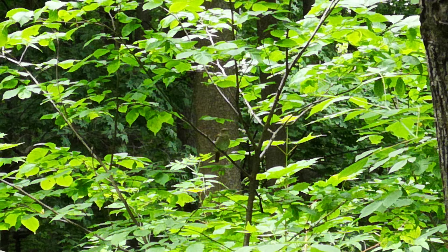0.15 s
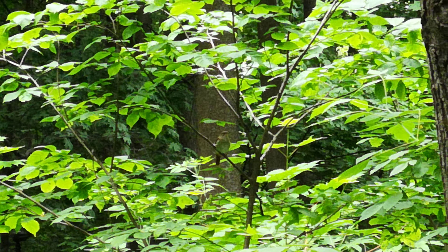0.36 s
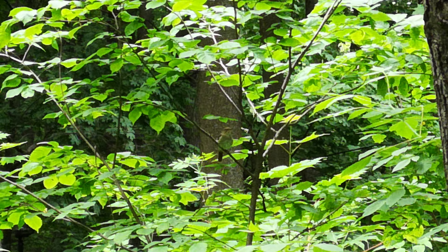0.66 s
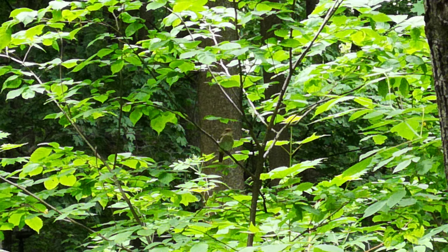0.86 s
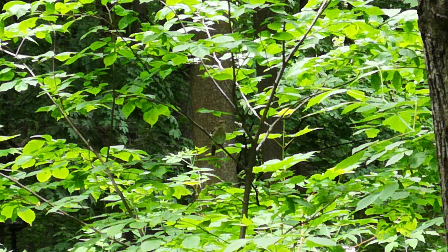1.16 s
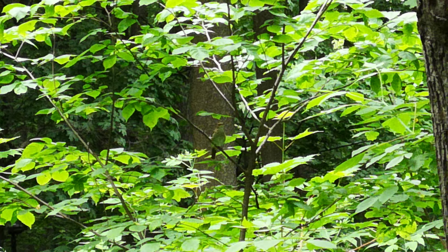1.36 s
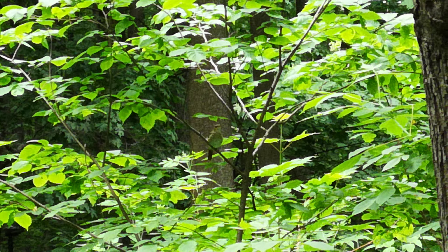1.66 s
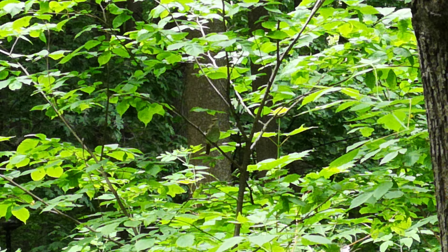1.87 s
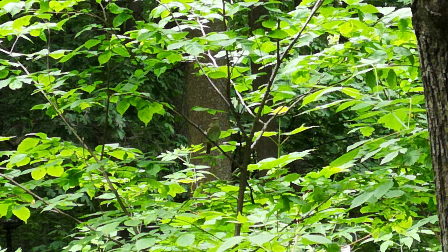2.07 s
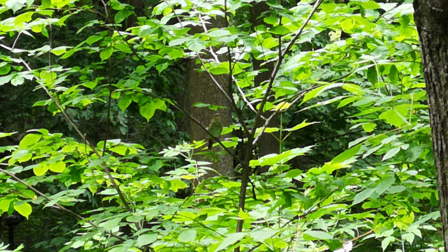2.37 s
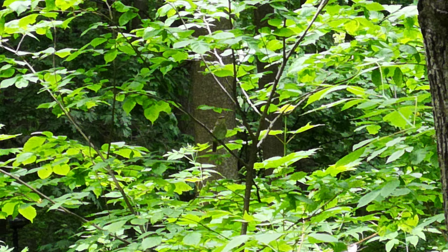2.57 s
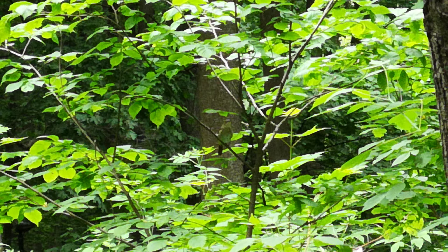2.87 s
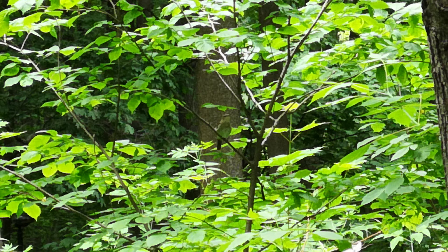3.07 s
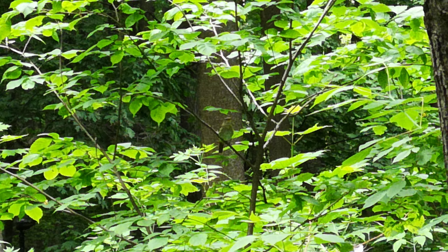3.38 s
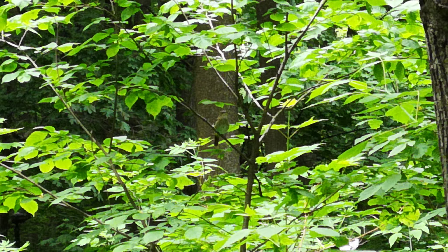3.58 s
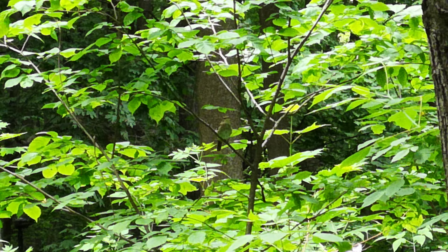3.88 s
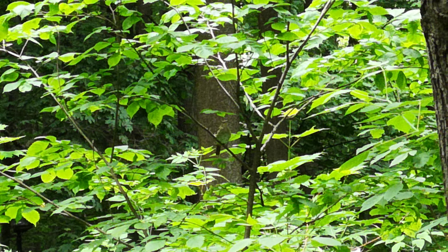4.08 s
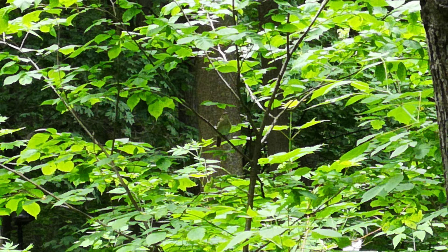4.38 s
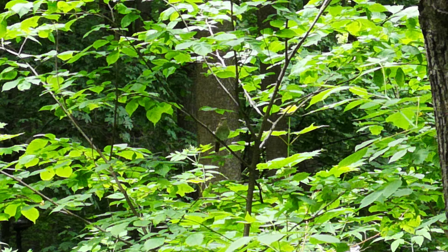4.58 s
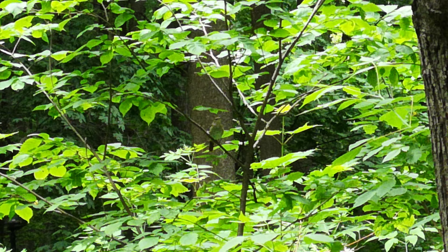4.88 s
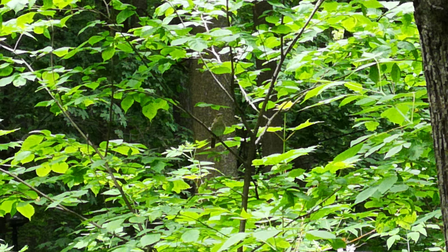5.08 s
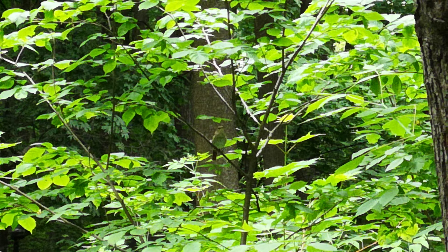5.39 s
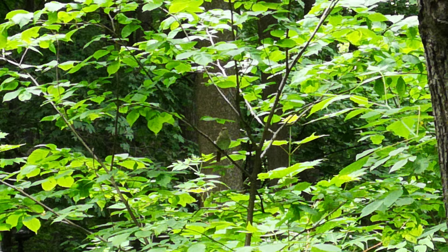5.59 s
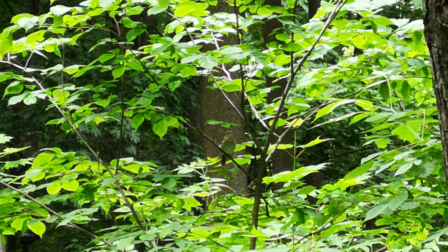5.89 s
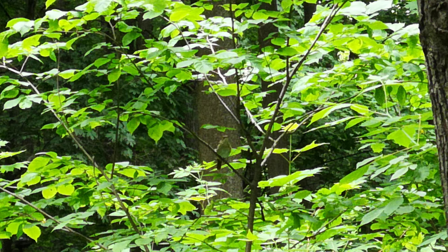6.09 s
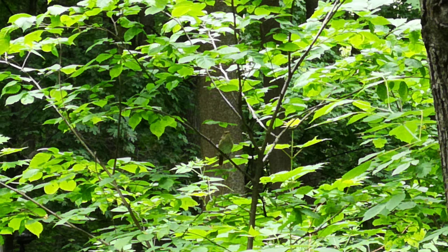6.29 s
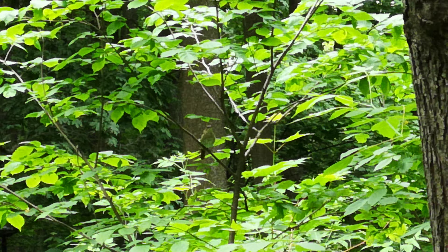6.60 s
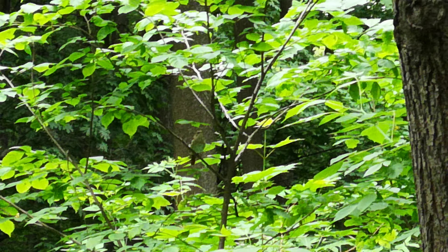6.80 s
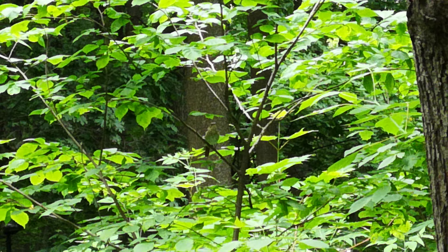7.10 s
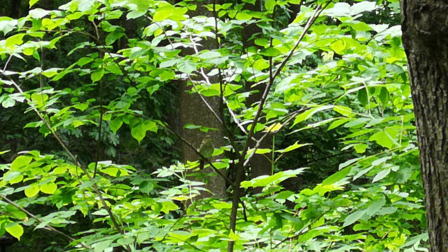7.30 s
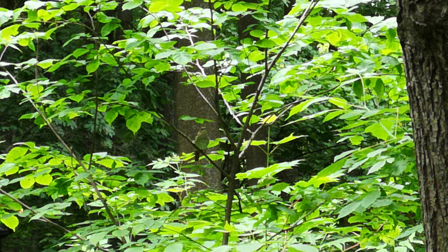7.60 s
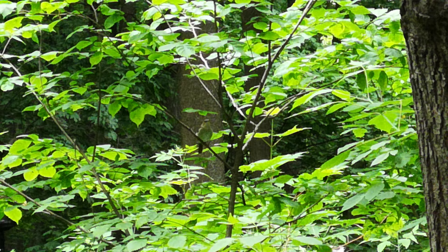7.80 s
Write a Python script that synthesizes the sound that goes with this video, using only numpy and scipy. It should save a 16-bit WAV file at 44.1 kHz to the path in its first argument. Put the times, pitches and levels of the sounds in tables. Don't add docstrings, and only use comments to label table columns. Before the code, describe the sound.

Thin bright whistles, low fluting notes and a six-beat clicking rattle from a songbird in an echoing wood, then one loud twig crack at right.

```python
import sys
import numpy as np
from scipy import signal
from scipy.fft import rfft, irfft, next_fast_len
from scipy.io import wavfile
from scipy.ndimage import uniform_filter1d

SR = 44100
rng = np.random.default_rng(int(sys.argv[2]) if len(sys.argv) > 2 else 0)


def decibels_to_gain(level_db):
    exponent = np.asarray(level_db, float) / 20
    return 10 ** exponent


def materialize(psi):
    bounded = np.clip(np.atleast_2d(psi).T, -1, 1)
    quanta = np.round(bounded * 32767).astype(np.int16)
    wavfile.write(sys.argv[1], SR, quanta)


N = 350154
T = np.arange(N) / SR
HZ = np.maximum(np.fft.rfftfreq(N, 1 / SR), 1)


def along(table, hz):
    f, v = np.transpose(table)
    return np.interp(np.log(hz), np.log(f), v)


def colour(x, db):
    return irfft(rfft(x, N) * decibels_to_gain(db), N)


def unit(x):
    return x / np.sqrt(np.mean(x ** 2))


def walk(rate):
    k = int(SR / rate)
    steps = np.repeat(rng.standard_normal(N // k + 1), k)
    return 1.5 * uniform_filter1d(uniform_filter1d(steps, k), k)[:N]


def ring(x, hz, t60):
    pole = np.exp(2j * np.pi * hz / SR - np.log(1000) / (t60 * SR))
    return signal.lfilter([1], [1, -pole], x).imag


def glides(rows, halfway):
    return [(s, length, first, first + halfway * (last - first), last, db)
            for s, length, first, last, db in rows]


def whistles(notes, swell, close, linger=0):
    # multiple of the whistle, level in dB under it.
    overtones = [(2, -33.5), (4, -48), (7, -49)]
    # frequency in Hz, level in dB.
    beak = [(3500, -3.5), (7500, -2), (9500, -20), (11500, -3), (13500, -11.5)]
    longest_rise_s = .026
    out = np.zeros(N)
    for s, length, first, middle, last, db in notes:
        i, u = int(s * SR), np.linspace(0, 1, int(length * SR))
        curve = np.polyfit([0, .5, 1], [first, middle, last], 2)
        hz = np.polyval(curve, u - linger * np.sin(2 * np.pi * u) / (2 * np.pi))
        phase = 2 * np.pi * np.cumsum(hz) / SR
        tone = np.sin(phase)
        for k, under_db in overtones:
            level = decibels_to_gain(under_db + along(beak, k * hz))
            tone = tone + level * np.sin(round(k) * phase) * (k * hz < 14000)
        rise = np.sin(np.pi / 2 * np.minimum(u / min(swell, longest_rise_s / length), 1)) ** 2
        fall = np.sin(np.pi / 2 * np.minimum((1 - u) / close, 1))
        out[i:i + len(u)] += (np.sqrt(2) * decibels_to_gain(db + 2.4) * rise * fall * tone)[:N - i]
    return out


def wood(x, wet_db):
    # frequency in Hz, time to fall 60 dB in seconds, level in dB.
    echoes = [(1500, 0.77, 3.5), (3420, 0.92, 3.5), (4580, 0.73, -7.5), (5230, 0.97, 0), (5800, 0.85, 2.5),
              (7400, 0.56, -2), (9500, 0.56, 6.5), (12000, .25, 0.5)]
    build_up_s = .012
    n = int(1.2 * SR)
    t, f = T[:n], np.maximum(np.fft.rfftfreq(n, 1 / SR), 1)
    patchy_db = 0.94 * np.array([walk(118)[:n], walk(120)[:n]])
    noise = rfft(rng.standard_normal((2, n)) * decibels_to_gain(patchy_db))
    tail = 0
    for k, (hz, t60, db) in enumerate(echoes):
        share = along([(h, float(j == k)) for j, (h, *_) in enumerate(echoes)], f)
        tail = tail + irfft(noise * share, n) * decibels_to_gain(db - 60 * t / t60)
    tail = tail * (1 - np.exp(-t / build_up_s))
    tail = tail * (1 + 2.18 * np.exp(-t / 0.025))
    tail = tail * decibels_to_gain(wet_db) / np.sqrt(SR)
    return signal.fftconvolve(x[None], tail, axes=1)[:, :N]


def background():
    # time in seconds, load in dB.
    traffic = [(0, -49), (.3, -40.5), (1.0, -39.5), (1.4, -41.5), (1.8, -40.5), (2.1, -43), (2.45, -39.5),
               (2.56, -31.5), (2.9, -44), (3.5, -39), (4.2, -39), (4.7, -41), (5.5, -41.5), (6.2, -39),
               (6.7, -40), (7.2, -39.5), (7.86, -38), (7.94, -47)]
    follow_load = [1.0, .4, .2, 0]
    wander_db = [0.49, 0.87, 0.99, 0.99]
    # frequency in Hz, level in dB per Hz.
    rumble = [(12, -34), (20, -13.5), (43, -5), (62, 1), (74, -8.5), (92, -9), (180, -17.5), (270, -25.5),
              (581, -40.5), (947, -25.5), (1250, -34), (1900, -39), (4000, -61.5), (5200, -89),
              (8800, -120)]
    # frequency in Hz, side minus mid in dB.
    sides = [(30, -15), (60, -38), (125, -17.5), (250, -14), (500, 5), (1000, -3), (2000, 0.5), (8000, 0)]
    # frequency in Hz, level in dB per Hz.
    hiss = [(2350, -20), (4000, -1), (4240, -5), (5330, -1.5), (6200, -4.5), (7430, -0.5), (8400, -13.5),
            (9440, -16), (12800, -16.5), (15200, -14.5), (16200, -23)]
    s, load = np.transpose(traffic)
    load = np.interp(T, s, load - np.median(load))
    swells = [share * load + db * walk(3.053) for share, db in zip(follow_load, wander_db)]
    swell_s, swell_width_s, swell_db = 2.22, 1.18, 6
    swells[-1] = swells[-1] + swell_db * np.exp(-((T - swell_s) / swell_width_s) ** 2)

    n = next_fast_len(N, real=True)
    f = np.maximum(np.fft.rfftfreq(n, 1 / SR), 1)
    mid, side, left, right = rfft(rng.standard_normal((4, n)))
    mid = mid * decibels_to_gain(along(rumble, f))
    side = side * decibels_to_gain(along(rumble, f) + along(sides, f))
    low = np.array([mid + side, mid - side])
    high = np.array([left * decibels_to_gain(2.2), right]) * decibels_to_gain(along(hiss, f))
    low = low * decibels_to_gain(-37) / np.std(irfft(low, n))
    high = high * decibels_to_gain(-72.5 + 2.5) / np.std(irfft(high, n))
    both = low + high

    out = 0
    for hz in 20 * 2 ** np.arange(0, 10.1, .5):
        share = np.clip(1 - 2 * np.abs(np.log2(f / hz)), 0, 1)
        follow = [along([(h, float(j == k)) for j, h in enumerate([90, 230, 900, 7000, 9500])], hz)
                  for k in range(4)]
        flicker_db = .6 * walk(7.4)
        db = sum(w * v for w, v in zip(follow, swells) if w) + flicker_db
        out = out + decibels_to_gain(db) * irfft(both * share, n)[:, :N]
    return out


def far_calls():
    # start in seconds, length in seconds, first Hz, last Hz, level in dB.
    short_calls = [(.16, .08, 2490, 2720, -69), (.19, .06, 2920, 2830, -76), (.225, .05, 2400, 2300, -62),
                   (.28, .075, 2380, 2330, -66), (1.585, .018, 3300, 4000, -71),
                   (1.66, .018, 3300, 4200, -69), (1.735, .018, 3200, 4000, -69),
                   (2.035, .09, 3450, 3190, -59), (2.21, .07, 3520, 3200, -57),
                   (2.285, .065, 3300, 3180, -62), (2.39, .05, 3500, 3100, -64),
                   (4.66, .04, 3200, 2300, -75), (5.6, .09, 2600, 2250, -73), (4.88, .012, 4500, 7500, -73)]
    # start in seconds, level in dB.
    arches = [
        (2.13, -62),
        (2.18, -67),
        (2.31, -59),
    ]
    notes = glides(short_calls, 0.69) + [(s, .03, 4940, 5900, 4720, db) for s, db in arches]
    return whistles(notes, 0.15, 0.5)


def far_warble():
    # time in seconds, level in dB, centre pitch in Hz.
    path = [
        (1.5, -72, 3800),
        (1.8, -59, 3950),
        (2.1, -58, 4300),
        (2.4, -55, 4200),
        (2.55, -47, 3700),
        (2.9, -54.5, 3612),
        (3.1, -54.5, 3400),
        (3.25, -54.5, 2790),
        (3.5, -71, 2700),
    ]
    s, db, hz = np.transpose(path)
    trembling_hz = np.interp(T, s, hz) * (1 + 0.26 * walk(160))
    phase = 2 * np.pi * np.cumsum(trembling_hz) / SR
    return np.sin(phase) * decibels_to_gain(np.interp(T, s, db, -120, -120) + 1.5 * walk(20))


def far_trill():
    start_s, period_s, count = 6.874, .0648, 17
    beats = start_s + period_s * np.arange(count)
    fade_db = -75 - 24 * (beats - 7.55) ** 2 + 1.5 * rng.standard_normal(count)
    notes = [(s, .016, 5100, 5900, 6800, db) for s, db in zip(beats, fade_db)]
    notes += [(s + 0.016, .011, 6300, 6800, 7400, db - 2) for s, db in zip(beats[:-1], fade_db[::-1])]
    return whistles(notes, 0.61, 0.33)


def far_birds():
    # start in seconds, length in seconds, first Hz, middle Hz, last Hz, level in dB.
    chirp = [
        (3.909, 0.0096, 2400, 1996, 1540, -40),
    ]
    calls, warble, trill = far_calls(), far_warble(), far_trill()
    direct = calls * decibels_to_gain(np.array([[-3.5], [-1.5]])) + trill * decibels_to_gain(np.array([[-5.0], [3.0]]))
    direct = direct + whistles(chirp, 0.64, 0.53) * decibels_to_gain(np.array([[-4.0], [2.5]]))
    return direct + wood(decibels_to_gain(-2.0) * calls + warble + decibels_to_gain(-4) * trill, 9.0)


def tinks():
    # plunge time in seconds, whistle length in seconds, bottom Hz, whistle dB, plunge dB.
    calls = [
        (1.811, 0.042, 5700, -28.5, -24.5),
        (2.442, .049, 5730, -26.5, -23),
        (4.117, .041, 5800, -28, -28.5),
    ]
    notes = []
    for s, length, low_hz, db, plunge_db in calls:
        notes += [(s - length, length, low_hz + 377, low_hz, 6050, db),
                  (s - 0.0044, 0.0089, 5760, 6173, 5960, db - 6.5),
                  (s, .007, 5700, 5070, 3700, plunge_db)]
    return notes


def rattle():
    # start in seconds, first peak in dB, second peak in dB.
    beats = [
        (2.6701, -24, -23),
        (2.8659, -23, -21),
        (3.0596, -24, -23),
        (3.2490, -26, -26),
        (3.4376, -22, -23),
        (3.6440, -28, -25),
    ]
    # multiple of its centre pitch, level in dB, share of fall each way.
    throat = [(.36, -24, .3), (.6, -10, .36), (1.0, 0, .16), (1.45, -33, .2), (1.85, -35, .13)]
    # delay in seconds, level in dB.
    branches = [(.0015, -5), (.0033, -8), (.0098, -15), (.016, -17)]
    click_s, gap_s, click_hz = .0024, .0064, (7080, 6930)
    out, u = np.zeros(N), np.linspace(0, 1, round(click_s * SR))
    clicks = [(s + k * gap_s, db, click_hz[k]) for s, *pair in beats for k, db in enumerate(pair)]
    for (s, db, hz), grit in zip(clicks, rng.standard_normal((len(clicks), 16))):
        click = 0
        for j, (k, level_db, fall) in enumerate(throat):
            phase = 2 * np.pi * np.cumsum(k * hz * (1 + fall * (1 - 2 * u))) / SR
            click = click + decibels_to_gain(level_db + 1.5 * grit[j]) * np.sin(phase + 3 * grit[j + 5])
        ragged_db = 2.5 * np.interp(u, np.linspace(0, 1, 6), grit[10:])
        click = click * np.sin(np.pi * u ** .75) ** 2 * decibels_to_gain(ragged_db)
        out[int(s * SR):][:len(u)] += decibels_to_gain(db + 1.5) * click / np.abs(click).max()
    return out + sum(decibels_to_gain(db) * np.roll(out, int(d * SR)) for d, db in branches)


def nightingale():
    # start in seconds, length in seconds, first Hz, last Hz, level in dB.
    flicks = [
        (.161, 0.03, 7150, 7720, -52),
        (.176, .016, 7600, 6330, -54),
        (.464, .012, 4000, 4600, -48.5),
        (.507, 0.00099, 8100, 5500, -51.5),
        (.766, 0.034, 6800, 7600, -33),
        (.783, 0.022, 7560, 7504, -30),
        (.789, .013, 7660, 6440, -34),
        (1.057, 0.01, 3860, 4340, -55),
        (1.783, .0018, 8400, 6640, -52.5),
        (4.069, .017, 6340, 5730, -37),
    ]
    slurs = [
        (.438, 0.028, 4000, 3950, -37),
        (.498, .03, 5300, 4555, -35.5),
        (1.021, 0.035, 4070, 3715, -31),
        (1.089, 0.033, 5240, 4435, -25.5),
    ]
    flutes = [
        (1.372, 0.074, 2030, 1595, -39),
        (1.524, 0.068, 1920, 1740, -37),
        (2.048, .08, 1900, 1389, -36.5),
        (2.195, .074, 1820, 1550, -35.5),
    ]
    # frequency in Hz, left minus right in dB.
    shade = [(1500, 0), (2500, 2), (3200, 10), (3800, 8), (4650, 15), (5200, 12), (5600, 2), (7300, 4),
             (12000, 2)]
    # frequency in Hz, milliseconds by which left is late.
    lag = [(1500, 0), (3000, .18), (5150, .18), (5550, -.045), (7600, -.04), (9000, 0)]
    song = glides(slurs, 0.68) + glides(flicks, 0.46) + tinks()
    voice = whistles(song, .72, .13) + rattle()
    voice = voice + whistles(glides(flutes, .56), 0.33, 0.2, linger=.8)
    earlier = np.exp(2j * np.pi * HZ * along(lag, HZ) / 1000)
    right = irfft(rfft(voice) * decibels_to_gain(-along(shade, HZ)) * earlier, N)
    return np.array([voice, right]) + wood(voice, 2.6) * decibels_to_gain(np.array([[.8], [-1.2]]))


def snap():
    snap_s, snap_db = 6.70255, -.3
    hit = np.zeros(N)
    slips = [(-.0046, -29), (-.0029, -26), (-.0023, -24), (-.0005, -16), (0, -3.5), (.0006, -15), (.001, -21)]
    for lead, db in slips:
        hit[int((snap_s + lead) * SR)] = -decibels_to_gain(db)
    soften = signal.butter(2, 12000, fs=SR, output="sos")
    push = signal.sosfilt(soften, np.convolve(hit, np.hanning(7), "same"))

    crack = ring(push, 2300, 0.0017) + decibels_to_gain(-6.5) * ring(push, 5550, 0.0011)
    crack = crack + decibels_to_gain(-36) * ring(push, 260, 0.0075)
    right = crack * decibels_to_gain(snap_db) / np.abs(crack).max()
    dull = ring(push, 790, 0.0013) + decibels_to_gain(-32) * ring(push, 250, 0.007)
    dull = dull + decibels_to_gain(-31.0) * ring(push, 6100, 0.00092)
    left = np.roll(dull * decibels_to_gain(snap_db - 15.5) / np.abs(dull).max(), 26)

    gate = np.interp(T - snap_s, [0, .004, .03, .075, .085, .1], [0, 0.93, 0.68, 1.0, 0.96, 0.021])
    leaf_db = along([(900, -31), (2500, 22), (7500, 12), (8600, -39)], HZ)
    rustle = np.array([unit(colour(rng.standard_normal(N), leaf_db)) for _ in range(2)])
    rustle_db = 2.4 * walk(150) + np.array([[-61], [-53]])
    return np.array([left, right]) + rustle * gate * decibels_to_gain(rustle_db)


def scene():
    return background() + far_birds() + nightingale() + snap()


def band_limit(x):
    return signal.sosfilt(signal.butter(12, 16310, fs=SR, output="sos"), x)


def record(dry):
    return band_limit(dry)


dry = scene()
out = record(dry)
materialize(out)
```